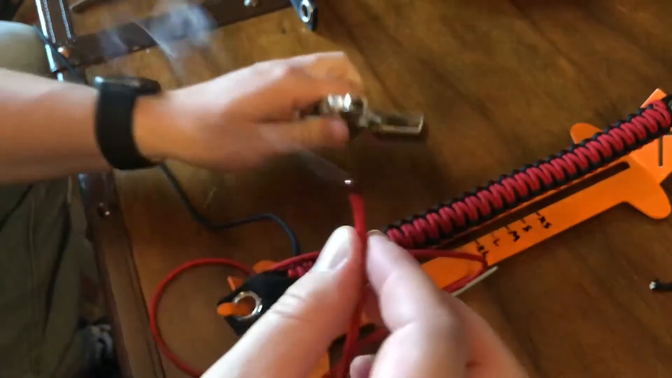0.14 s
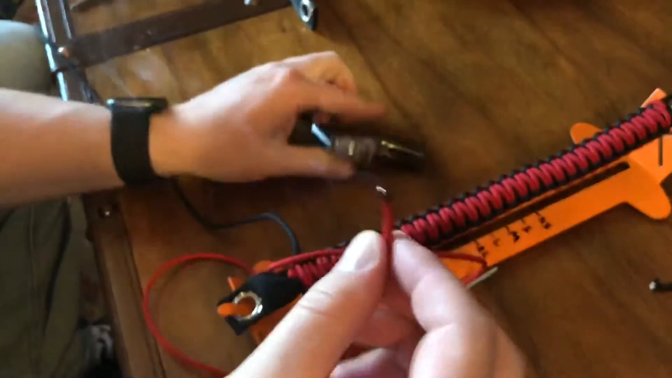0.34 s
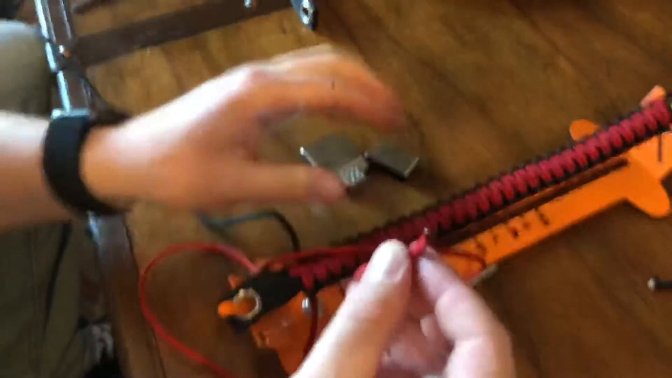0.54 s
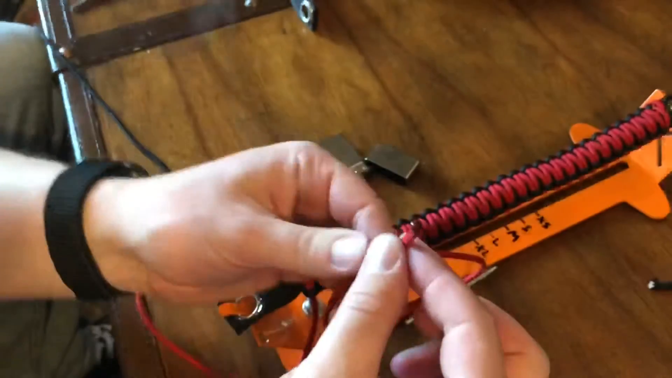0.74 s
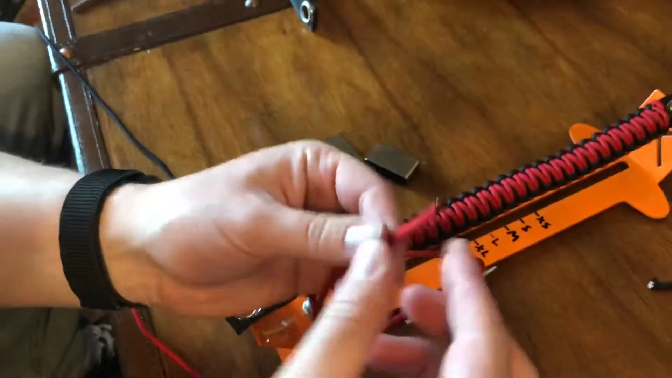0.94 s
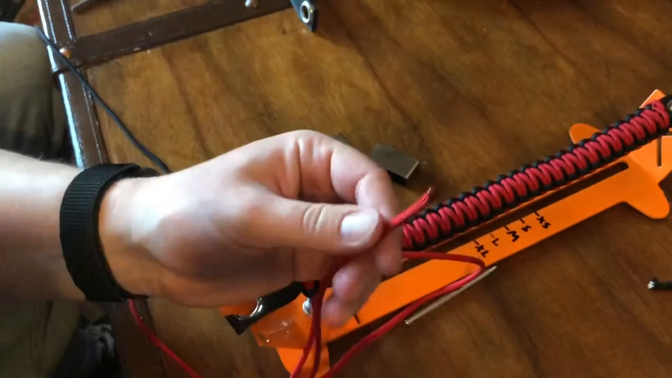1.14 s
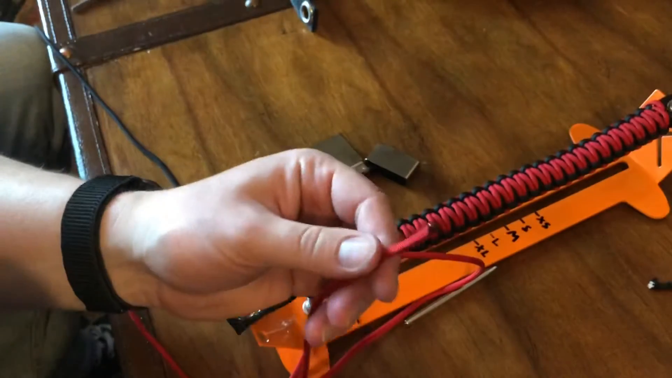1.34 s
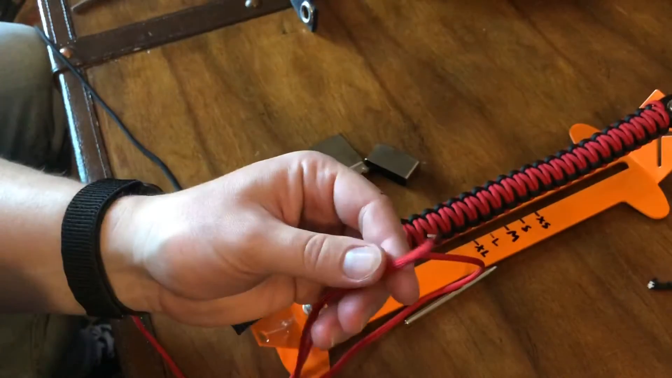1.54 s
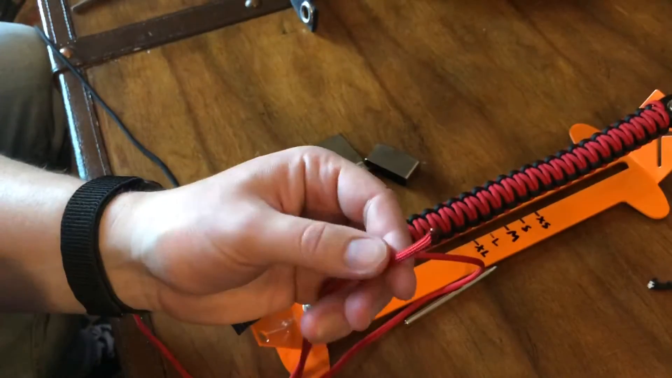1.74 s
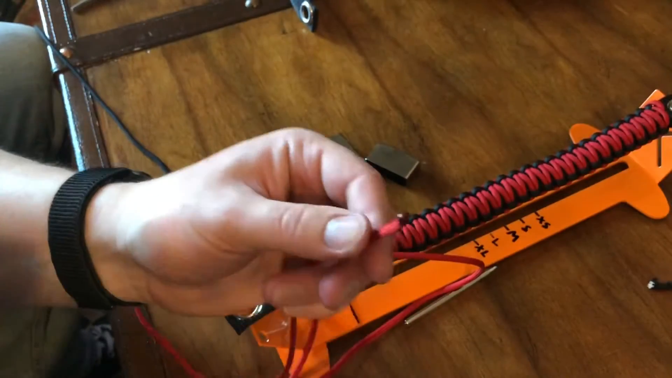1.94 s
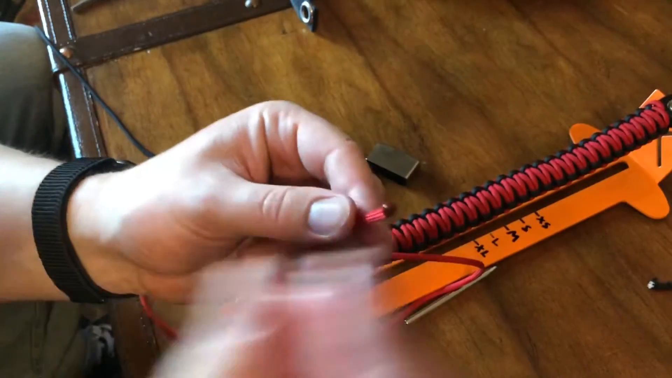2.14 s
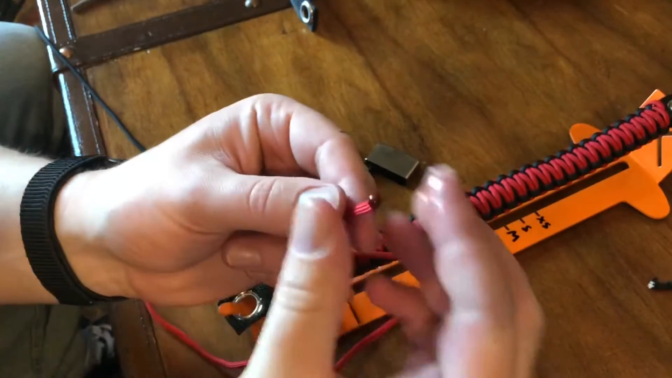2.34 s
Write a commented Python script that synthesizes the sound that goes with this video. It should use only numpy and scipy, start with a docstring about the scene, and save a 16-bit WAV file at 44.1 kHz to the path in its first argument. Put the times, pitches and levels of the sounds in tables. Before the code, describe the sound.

A metal flip-top lighter lands on a wooden table with a clack and thump, then tips over with a louder, ringing clack; afterwards faint cord-handling ticks over quiet humming room tone, close microphone, small room.

```python
"""Quiet room tone with mains hum runs throughout: steady coloured noise and two sines.
A faint metal contact and a tick come first. An open flip-top metal lighter, let go, then lands on a wooden
table at 0.2 s and tips over by 0.53 s: its lid clacks (filtered noise cracks and decaying modes) and the
board thumps (a dispersive bending wave and its modes), while a small room answers with a diffuse tail.
From 1.1 s fingers work a cord with faint ticks, short bursts of resonant noise."""
import sys
import numpy as np
from scipy import signal
from scipy.fft import rfft, irfft
from scipy.io import wavfile

SR = 44100
rng = np.random.default_rng(int(sys.argv[2]) if len(sys.argv) > 2 else 0)


def output_pcm(signal):
    """Save a mono or channel-first signal as 16-bit PCM at the path in sys.argv[1].

    Samples are clipped to [-1, 1] before scaling.
    """
    pcm = np.clip(np.atleast_2d(signal).T, -1, 1) * 32767
    wavfile.write(sys.argv[1], SR, np.round(pcm).astype(np.int16))


N = 110250  # samples, 2.5 s
T = np.arange(N) / SR  # time [s]
FREQS = np.maximum(np.arange(N // 2 + 1) * SR / N, 1)  # spectrum bins [Hz]


def undb(db):
    """Level law: decibels to amplitude gain."""
    return 10 ** (np.asarray(db) / 20)


def unit(x):
    """Energy normalisation: the squared samples sum to one."""
    return x / np.sqrt(np.sum(x ** 2))


def curve(points, hz=FREQS):
    """Logarithmic pitch scale: interpolate (frequency [Hz], value) points along log frequency."""
    p = np.array(points)
    return np.interp(np.log(hz), np.log(p[:, 0]), p[:, 1])


def colour(x, gain):
    """Minimum-phase filtering: a folded cepstrum makes the response to this gain causal."""
    cepstrum = irfft(np.log(gain + 1e-5), N)
    cepstrum[1:N // 2] *= 2
    cepstrum[N // 2 + 1:] = 0
    response = np.exp(rfft(cepstrum))
    return irfft(rfft(x) * response, N)


def delay(x, s):
    """Propagation delay: start a sound s seconds later."""
    silence = np.zeros(max(int(s * SR), 0))
    return np.concatenate([silence, x])[:N]


def fade(t60):
    """Exponential damping: amplitude falls by 60 dB in t60 seconds."""
    return np.exp(-np.log(1000) * T / t60)


def soften(hz, cut_hz):
    """Contact stiffness: a softer contact excites less above its cut-off."""
    return 1 / np.sqrt(1 + (hz / cut_hz) ** 4)


def burst(t60, gain):
    """Impact noise: a short coloured crack of unit energy."""
    noise = rng.standard_normal(N) * fade(t60)
    return unit(colour(noise, gain))


def ring(modes):
    """Modal superposition: a struck object is a sum of decaying sines, here with unit energy."""
    turns = rng.random(len(modes))  # random starting phases [cycles]
    total = np.zeros(N)
    for (hz, db, t60), turn in zip(modes, turns):
        total += undb(db) * fade(t60) * np.sin(2 * np.pi * (hz * T + turn))
    return unit(total)


# spectral shape of the air noise: (frequency [Hz], relative density [dB per Hz])
AIR_SPECTRUM = [(24, -39), (40, -10), (91, -9), (124, -3.5), (204, -8), (237, -5.5), (262, -16), (320, -9),
                (503, -19.5), (1040, -17), (1340, -19.5), (1590, -20), (2000, -21), (6650, -35),
                (16000, -55.5)]
AIR_DB = -52  # RMS level [dB]
# mains harmonics: (frequency [Hz], RMS level [dB])
MAINS_HUM = [(120, -57.5), (240, -70)]


def room_tone():
    """Stationary background: shaped random noise plus harmonics of the mains."""
    noise = rfft(rng.standard_normal(N))
    air = unit(irfft(noise * undb(curve(AIR_SPECTRUM)), N)) * np.sqrt(N)  # unit RMS
    hum = np.zeros(N)
    for hz, db in MAINS_HUM:
        hum += undb(db) * np.sqrt(2) * np.sin(2 * np.pi * (hz * T + rng.random()))
    return undb(AIR_DB) * air + hum


# metal contacts: (time [s], crack level [dB], contact cut-off [Hz], sizzle [dB], crack t60 [s],
#                  case ring level [dB], lid ring level [dB], small parts ring level [dB])
METAL_CONTACTS = [(0.0297, -26.5, 14000, 0.5, 0.089, -33.5, -38, -32.5),
                  (0.2047, -3, 9000, -4, .022, -14, -28, -20.5),
                  (0.208, -1.5, 15000, 2, .014, -17, -33, -9),
                  (0.221, -2, 4500, -2.5, 0.048, -18, -27.5, -29.5),
                  (0.2445, 6.5, 3930, -10.5, 0.021, -18, -8, -18.5),
                  (0.4318, 1.5, 4500, -3, .035, -21, -19.5, -24),
                  (0.4395, 10, 14600, 4.5, 0.016, -10.5, -19, -11.5),
                  (0.4963, 1.5, 8000, -9, .015, -15, -26.5, -14.5),
                  (0.4985, 13.5, 7700, -1, 0.015, 1.5, -5, -27.5),
                  (0.5184, -2.5, 8000, -5.5, 0.03, -21, -24, -20)]
# spectral shape of a contact: (frequency [Hz], relative level [dB])
CONTACT_SPECTRUM = [(100, -3.5), (400, -10), (1000, -10), (1500, -3.5), (2100, 0.5), (2600, -1),
                    (3100, 4.5), (3600, -2.5), (4200, -1), (5600, -3), (6500, -0.5), (7900, -5), (8900, -7),
                    (10500, -11), (11700, -3), (13000, -9), (16000, -14.5)]
SIZZLE_HZ = 5860  # sizzle tilts the spectrum about here
# ringing of the case: (frequency [Hz], relative level [dB], t60 [s])
CASE_RESONANCES = [(1760, -11, .33), (2180, -7, .34), (2433, -9, .36), (3047, -7, .26), (3213, -8, .28),
                   (3553, -9, .38), (4152, -4, .3), (4380, -6, .22), (4707, 1, .37), (5040, -6, .3),
                   (5875, -10, .3), (6562, -2, .2), (7801, -4, .3), (8186, 0, .23), (11870, -13, .2),
                   (12560, -14, .14)]
# ringing of the lid: (frequency [Hz], relative level [dB], t60 [s])
LID_RESONANCES = [(5385, -11, .36), (5408, 0, .35), (8192, -13, .17), (10478, -9, .15), (12580, -14, .08),
                  (14150, -12, .1)]
# short pings of the small inner parts: (frequency [Hz], relative level [dB], t60 [s])
PART_RESONANCES = [(6830, 0, .035), (8900, -9, .05), (10470, -5, .09), (11650, -6, .06), (12500, -2, .08),
                   (12780, -6, .05)]


def lighter():
    """Impact excitation of modes: each contact cracks, then case, lid and parts ring; returns both."""
    cracks, rings = np.zeros(N), np.zeros(N)
    case, lid, parts = ring(CASE_RESONANCES), ring(LID_RESONANCES), ring(PART_RESONANCES)
    for s, db, cut_hz, sizzle_db, t60, case_db, lid_db, parts_db in METAL_CONTACTS:
        # positive sizzle favours the treble; unit energy cancels its overall gain
        tilt_db = sizzle_db * (-1 - soften(FREQS, SIZZLE_HZ) ** 2)
        gain = undb(curve(CONTACT_SPECTRUM) + tilt_db) * soften(FREQS, cut_hz)
        cracks += delay(undb(db) * burst(t60, gain), s)
        ringing = undb(case_db) * case + undb(lid_db) * lid + undb(parts_db) * parts
        rings += delay(ringing, s)
    return cracks, rings


# reverberation by band: (centre frequency [Hz], t60 [s], relative level [dB])
REVERB_BANDS = [(45, .9, 1), (90, 0.95, -20), (172, 0.47, -3), (270, .45, -12.5), (700, .48, -7.5),
                (1400, 0.39, -1.5), (2200, .43, -8.5), (3000, 0.51, -10), (4500, 0.52, -6),
                (6300, 0.48, -13.5), (8200, 0.45, -16), (12000, .23, -13), (16000, 0.21, -10)]
ROOM_GAP_S, ROOM_BUILD_S = 0.00081, 0.0042  # silence before the tail, then its rise time


def room():
    """Diffuse reverberation: noise bands build quickly, then decay at their own rates."""
    noise = rfft(rng.standard_normal(N))
    centres = np.log([row[0] for row in REVERB_BANDS])
    build = np.clip((T - ROOM_GAP_S) / ROOM_BUILD_S, 0, 1)
    tail = np.zeros(N)
    # each share is 1 at its own centre and 0 at the others, so neighbours crossfade
    for (hz, t60, db), share in zip(REVERB_BANDS, np.eye(len(REVERB_BANDS))):
        band = irfft(noise * np.interp(np.log(FREQS), centres, share), N)
        tail += undb(db) * band * unit(build * fade(t60))
    return tail


# fingers, cord and small nudges:
# (time [s], level [dB], centre frequency [Hz], width [octaves], t60 [s])
FINGER_TICKS = [(0.0315, -22, 1560, 0.22, 0.12), (.3665, -7.5, 695, 1.15, 0.128),
                (1.1035, -40, 9000, 1.2, .005), (1.117, -32.5, 5860, 1.2, .012),
                (1.1776, -21, 5100, 0.6, 0.0091), (1.2372, -29.5, 4930, 0.82, 0.015),
                (1.2586, -29, 3900, 0.9, .011), (1.379, -37, 10000, .8, .006),
                (1.398, -33, 6500, 1.2, .025), (1.438, -40, 7000, 0.47, 0.023),
                (1.445, -29, 1640, 0.89, 0.066), (1.475, -39.5, 7400, 0.9, 0.0053),
                (1.535, -27.5, 1420, 0.83, 0.13), (1.644, -27, 1050, .4, .015),
                (1.667, -44, 14550, .15, 0.019), (1.713, -46, 13000, .6, .004),
                (1.918, -35, 6010, 0.66, .008), (1.9354, -30.5, 11300, 0.74, 0.0044),
                (1.9722, -24, 1650, 0.32, .008), (1.981, -29, 4230, 1.02, .014)]


def fingers():
    """Resonant filtering of impact noise: small dry ticks, each with one broad peak and steep skirts."""
    ticks = np.zeros(N)
    for s, db, hz, width, t60 in FINGER_TICKS:
        octaves = np.log2(FREQS / hz)
        gain = 1 / (1 + (octaves / width) ** 2 / 6) ** 8
        ticks += undb(db) * delay(burst(t60, gain), s)
    return ticks


# near reflections of the metal cracks: (delay [s], level relative to the crack [dB])
NEAR_REFLECTIONS = [(.0115, -16.5), (.0155, -14), (.0215, -20)]


def reflections(cracks):
    """Discrete early reflection: weaker, delayed copies of the metal cracks."""
    return sum(undb(db) * delay(cracks, s) for s, db in NEAR_REFLECTIONS)


# landings on the board: (time [s], level [dB], rim echo delay [s],
#                         rim echo relative to the landing [dB], ringing relative to the landing [dB])
LANDINGS = [(0.2045, 14.5, 0.0095, -10, -9.5), (0.4394, 13.5, .0112, -10, -7),
            (0.5298, -5.5, .011, -11.5, -5)]
# spectral shape radiated by the board: (frequency [Hz], relative level [dB])
BOARD_SPECTRUM = [(30, -24), (65, -12), (120, -4.5), (200, -4), (330, 2.5), (520, -5.5), (800, -5.5),
                  (1200, -16), (2000, -34), (5000, -52)]
# lingering resonances of the table: (frequency [Hz], relative level [dB], t60 [s])
TABLE_RESONANCES = [(166, -8, .5), (198, -7, .45), (321, 0, .33), (390, -8, .3), (411, -8, .3),
                    (597, -12, .3), (726, -11, .4), (800, -10, .3), (1021, -15, .35)]
BEND_DELAY_S, BEND_POWER, BEND_HZ = .0047, 1.08, 330  # arrival delay at BEND_HZ and its fall with pitch


def board():
    """Dispersion of bending waves: highs arrive first, the rim returns the wave, the board rings on."""
    lag = BEND_DELAY_S * (BEND_HZ / np.maximum(FREQS, 50)) ** BEND_POWER
    phase = 2 * np.pi * np.cumsum(lag) * SR / N  # summing group delay over frequency gives phase
    spectrum = undb(curve(BOARD_SPECTRUM)) * np.exp(-1j * phase)
    wave = unit(irfft(spectrum, N) * (T < 1))
    swell = np.minimum(T / BEND_DELAY_S, 1)
    thumps = np.zeros(N)
    for s, db, echo_s, echo_db, ring_db in LANDINGS:
        rim_echo = undb(echo_db) * delay(wave, echo_s)
        ringing = undb(ring_db) * swell * ring(TABLE_RESONANCES)
        thumps += undb(db) * delay(wave + rim_echo + ringing, s)
    return thumps


RING_ROOM_DB, BOARD_ROOM_DB, TICK_ROOM_DB = -10, -1, -0.5  # sent to the room, relative to direct sound


def scene():
    """Superposition: direct sounds, near reflections, reverberation and room tone add."""
    wood, (cracks, rings), ticks = board(), lighter(), fingers()
    sent = cracks + undb(RING_ROOM_DB) * rings
    sent += undb(BOARD_ROOM_DB) * wood + undb(TICK_ROOM_DB) * ticks
    tail = signal.fftconvolve(sent, room())[:N]
    direct = wood + cracks + rings + ticks
    return (direct + reflections(cracks) + tail + room_tone())[None]


LOW_HZ, TOP_HZ = 32, 15900  # band limits of the recorder


def record(dry):
    """Saturation and band limiting: the recorder rounds high peaks, then cuts deepest bass and top."""
    rounded = dry / (1 + dry ** 4) ** .25
    bass_cut = signal.butter(2, LOW_HZ, "high", fs=SR, output="sos")
    top_cut = signal.ellip(10, .2, 80, TOP_HZ, fs=SR, output="sos")  # 0.2 dB ripple, 80 dB rejection
    return signal.sosfilt(top_cut, signal.sosfilt(bass_cut, rounded))


dry = scene()
out = record(dry)
output_pcm(out)
```